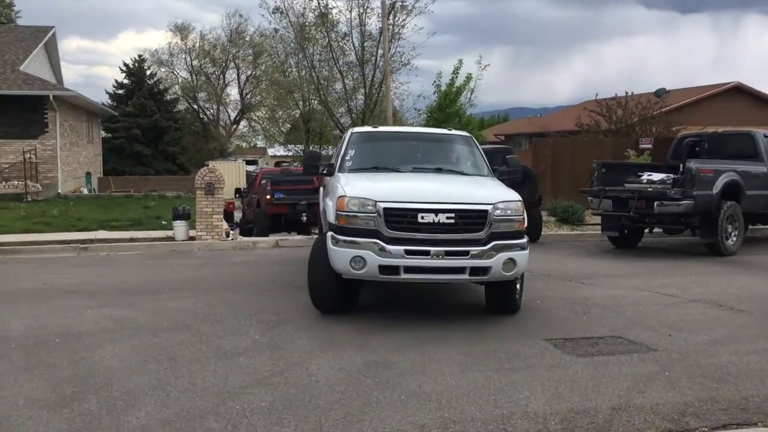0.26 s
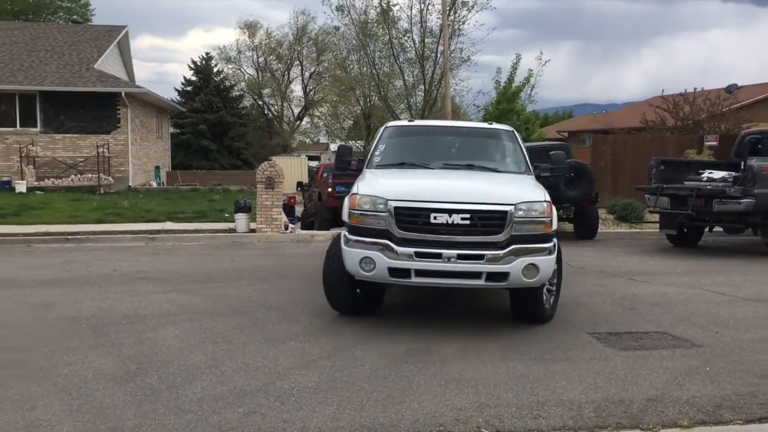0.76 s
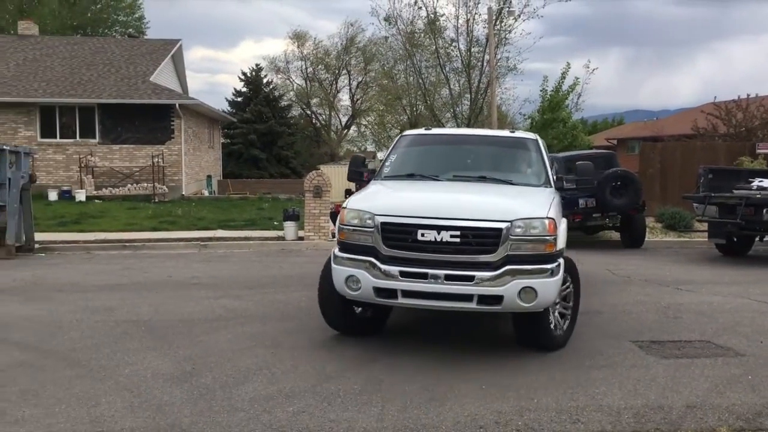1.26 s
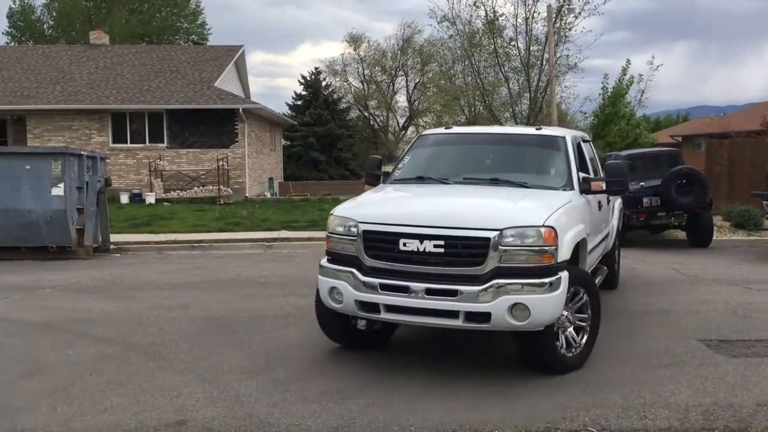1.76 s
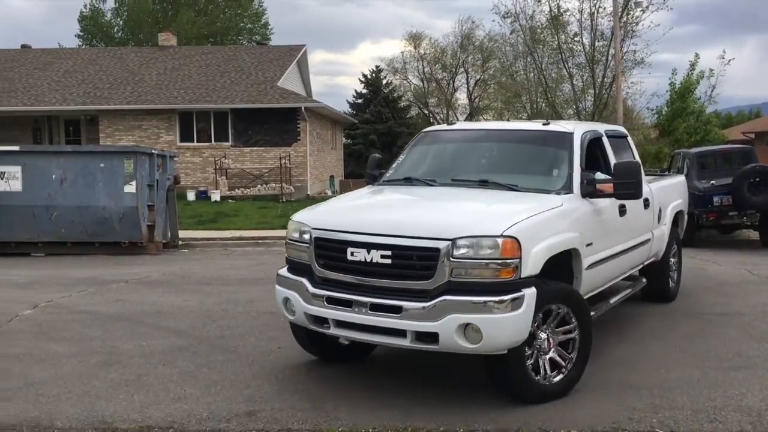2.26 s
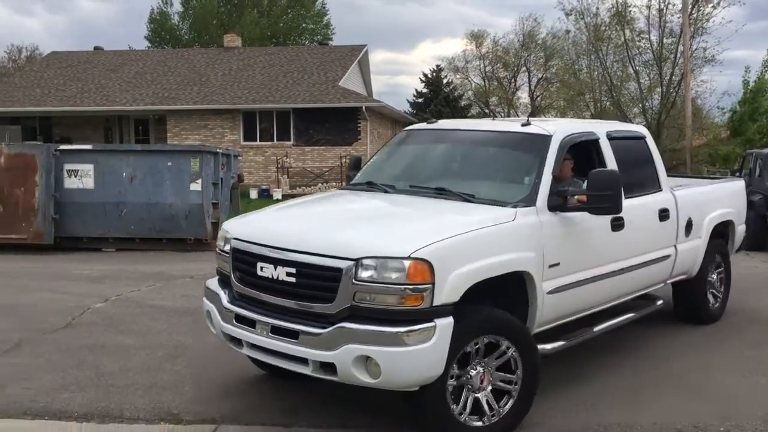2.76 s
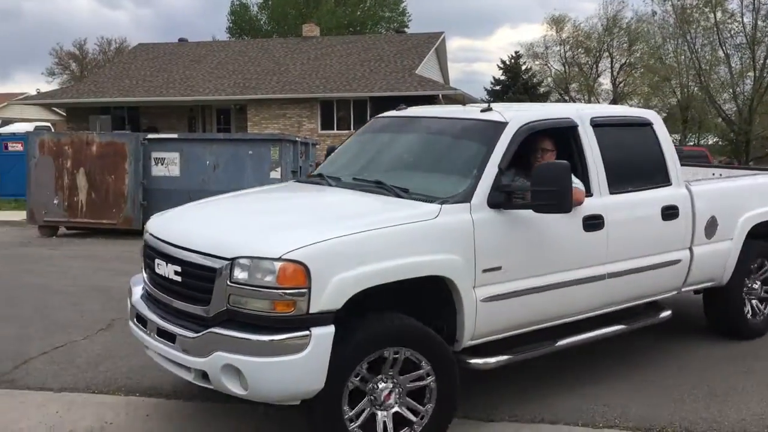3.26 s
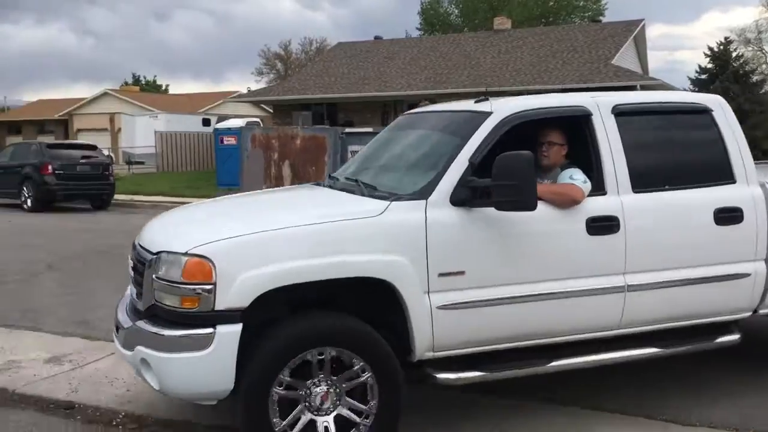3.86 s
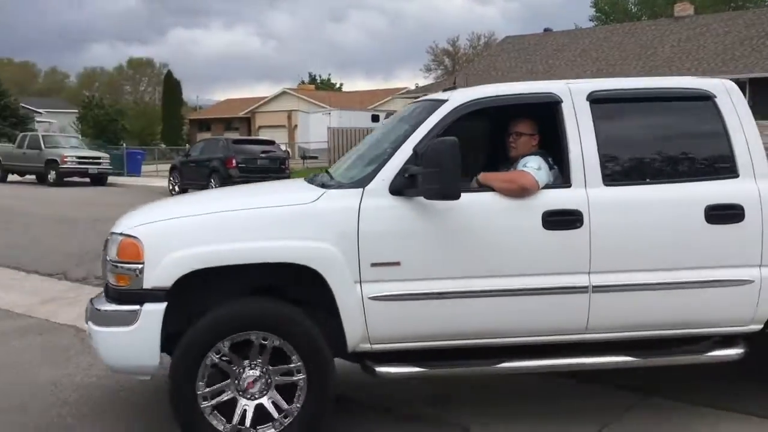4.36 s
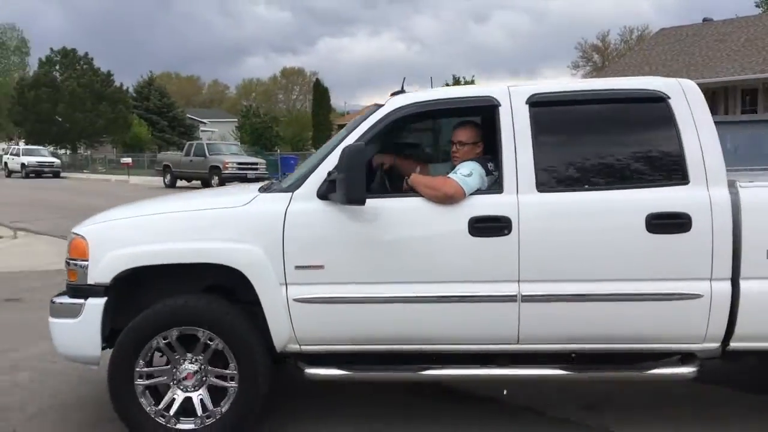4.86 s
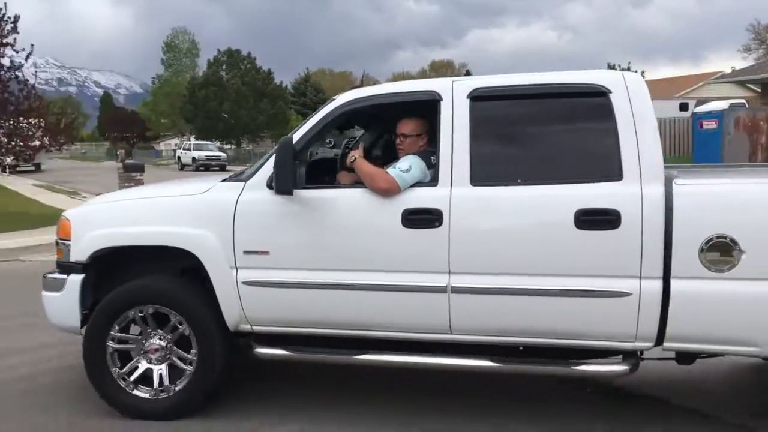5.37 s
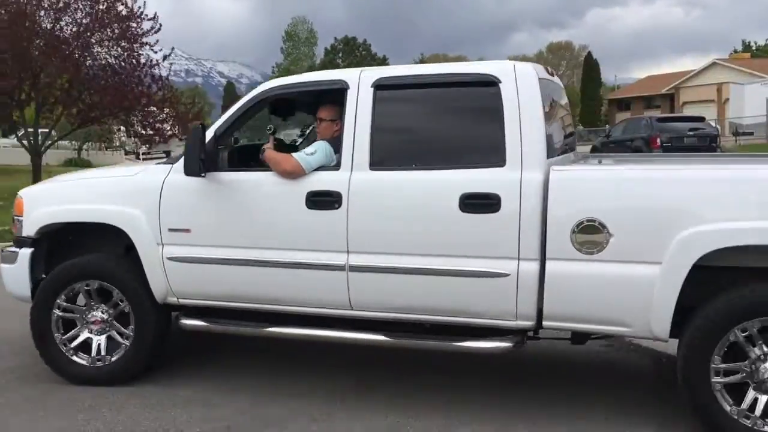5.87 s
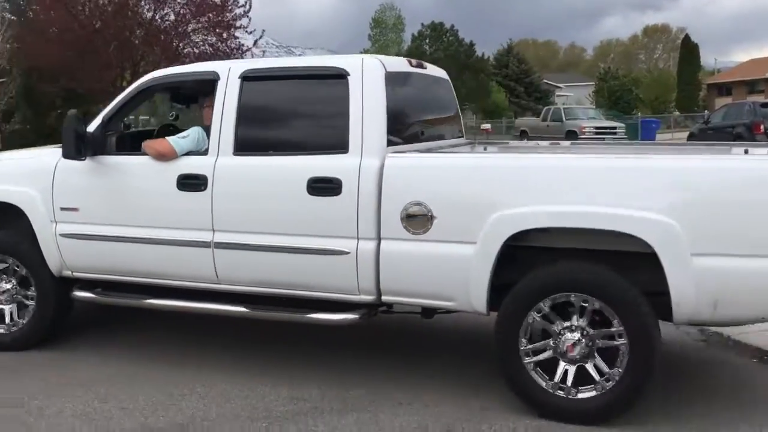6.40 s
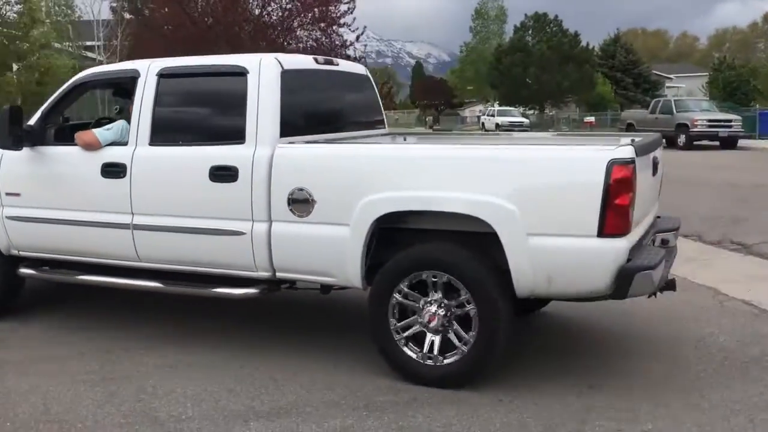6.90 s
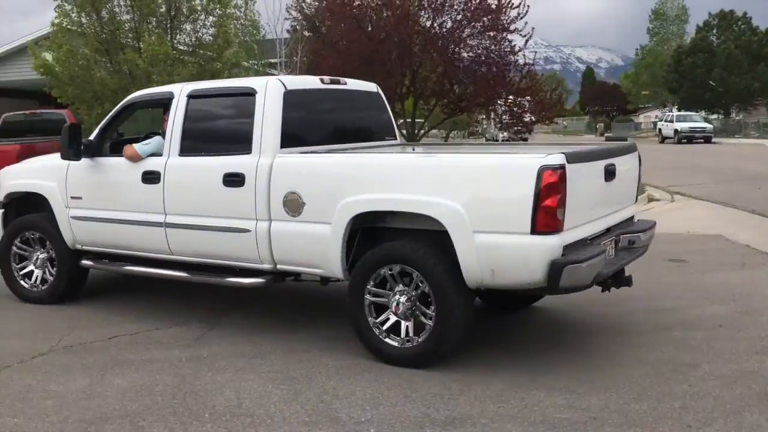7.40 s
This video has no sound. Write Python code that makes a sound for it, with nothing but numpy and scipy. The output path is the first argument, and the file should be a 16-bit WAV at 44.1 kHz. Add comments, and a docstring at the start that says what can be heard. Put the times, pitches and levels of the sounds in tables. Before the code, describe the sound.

A diesel pickup clatters slowly closer near idle, then revs up and rolls past with a swelling exhaust drone, while wind thumps the microphone.

```python
"""A breeze rumbles, flutters, thumps and flicks on the microphone throughout: noise and short pressure pulses.
At first a diesel V8 pickup creeps closer near idle; noise mixed with short rings and ticks set off by its
firings makes the clatter. Grit snaps now and then, as spikes with a tiny spray, and one hollow knock sounds
before the engine passes. Then the revs climb, the engine rolls by a few metres away, and the tailpipe's drone
swells unevenly as the rear comes near: sine tones tied to the firing rate, with a little gas noise."""
import sys
import numpy as np
from scipy import signal
from scipy.fft import rfft, irfft, next_fast_len
from scipy.io import wavfile
from scipy.ndimage import uniform_filter1d, minimum_filter1d, map_coordinates

SR = 44100
rng = np.random.default_rng(int(sys.argv[2]) if len(sys.argv) > 2 else 0)


def unload_wav(signal):
    """Save mono or channel-first audio to the path in sys.argv[1] as 16-bit WAV at rate SR, clipped to [-1, 1]."""
    wavfile.write(
        sys.argv[1],
        SR,
        np.round(np.clip(np.atleast_2d(signal).T, -1, 1) * 32767).astype(np.int16),
    )


N = 336924
TIME = np.arange(N) / SR  # seconds

# engine speed, two dabs at the pedal and then a steady pull: time_s, firings_per_s
FIRING_RATE = [(0, 43.6), (.6, 46.4), (.9, 52.4), (1.2, 52), (1.5, 47.5), (2.1, 50), (2.7, 46), (3.7, 47),
               (4.15, 54.4), (4.5, 52.3), (5.1, 60), (5.6, 65), (6.2, 66.8), (6.65, 70.8), (7.15, 68.3),
               (7.64, 68.6)]
# tone of fast air rasping on the microphone's port: pitch_hz, relative level_db
RASP_TONE = [(250, -25), (440, -3), (560, 2), (750, .5), (950, -5), (1200, -10.5), (1600, -19), (2100, -38),
             (5000, -100)]


def amp(db):
    """Turn decibels into a gain."""
    return 10 ** (np.asarray(db) / 20)


def unit(x):
    """Scale a sound to an average (rms) level of 1."""
    return x / np.sqrt(np.mean(x ** 2) + 1e-20)


def curves(rows):
    """Draw straight lines between table rows: one value per sample for each column after the time."""
    times, *columns = np.transpose(rows)
    return [np.interp(TIME, times, column) for column in columns]


def wobble(rate):
    """A smooth random curve through rate random points a second."""
    points = rng.standard_normal(int(N * rate / SR) + 4)
    return map_coordinates(points, [TIME * rate])


def filtered(x, response):
    """Multiply each frequency in x by response(hz)."""
    size = next_fast_len(N + 8192)
    hz = np.fft.rfftfreq(size, 1 / SR)
    return irfft(rfft(x, size) * response(hz), size)[:N]


def coloured(x, spectrum):
    """Shape the tone of x by (Hz, dB) points, joined by straight lines on a log pitch axis."""
    pitches, levels = np.transpose(spectrum)
    return filtered(x, lambda hz: amp(np.interp(np.log(hz + 1), np.log(pitches), levels)))


def noise(spectrum):
    """Random hiss shaped to a given tone, at rms 1."""
    return unit(coloured(rng.standard_normal(N), spectrum))


def steadied(x, span):
    """Even out the level of x over span seconds."""
    power = np.abs(uniform_filter1d(x ** 2, int(span * SR) + 1))
    return x / np.sqrt(power + 1e-4)


def breeze():
    """Pressure swings rumble on the port in clumps; faster air breaks into lumpy flutter."""
    # gusts and lulls: time_s, relative rumble level_db, flutter level_db
    gusts = [(0, -26.5, -28.5), (.35, -29, -32), (.55, -27.5, -36), (1.33, -26.5, -27.5),
             (1.46, -27, -21.5), (1.8, -27.5, -32), (1.92, -31.5, -44.5), (2.25, -37, -43.5),
             (2.3, -28.5, -33), (2.6, -27, -40.5), (2.92, -27.5, -48), (3.1, -23, -38), (3.5, -34, -40),
             (3.75, -24.5, -38.5), (3.92, -29.5, -48), (4.15, -22, -43), (4.47, -29, -45.5),
             (4.7, -26, -43), (4.91, -23.5, -45), (5.13, -23.5, -36), (5.35, -20.5, -32.5), (5.7, -26, -33),
             (6.15, -28.5, -30), (6.35, -27.5, -42), (7.64, -31.5, -45)]
    # tone of the low rumble: pitch_hz, relative level_db
    rumble_tone = [(20, -36), (30, -13), (42, -2), (56, 10), (80, 3.5), (120, 0.5), (180, -5), (260, -16),
                   (500, -57.5)]
    # tone of the steady flutter between eddies: pitch_hz, relative level_db
    flutter_tone = [(60, -41), (120, 0.5), (190, 1.5), (300, -3), (420, -7.5), (540, -16), (650, -19),
                    (850, -38), (1400, -51), (3000, -110)]

    rumble_db, flutter_db = curves(gusts)
    clumps = amp(3 * wobble(32))
    rumble = amp(rumble_db + 4.0) * steadied(clumps * noise(rumble_tone), span=0.18)
    # a strong gust churns evenly; lighter air comes in lumps
    lumps = wobble(65) * np.interp(flutter_db, [-29, -22], [1, .5])
    # the strongest gust and its biggest lumps turn raspy
    rasp_db = -17 + 2.4 * (flutter_db - flutter_db.max()) + 2 * lumps
    air = noise(flutter_tone) + amp(rasp_db) * noise(RASP_TONE)
    flutter = amp(flutter_db) * steadied(air * amp(3.5 * lumps), span=0.06)
    return rumble + flutter


def eddies(thump_db, rasp_db, rise, rasp_stretch, swing_time, swing_lead):
    """Each whirl of air hits the microphone with a sharp rasp and thump, and swings the pressure slowly."""
    # whirls: peak_s, relative thump level_db, relative rasp level_db, time scale length_s,
    # swing level_db, the pitch the swing slows toward swing_hz
    whirls = [(.008, -22.5, -29, .005, -16, 80.6), (.068, -25.5, -37, 0.0065, -24, 100),
              (0.267, -26.5, -39, 0.0041, -16, 81), (0.327, -22.5, -34, 0.0064, -23, 111.5),
              (.408, -29, -45, 0.0068, -22, 100), (0.741, -28, -45, 0.019, -20, 68.8),
              (1.097, -28, -47, 0.012, -22.5, 87.4), (1.369, -26.5, -53, .012, -15, 76),
              (1.402, -25, -41, .013, -30, 90), (1.445, -19.5, -38, .012, -29, 90),
              (1.476, -21.5, -33, 0.019, -12.5, 70), (1.523, -24, -42, 0.0078, -17, 103),
              (1.585, -24, -64, 0.0085, -11, 70), (1.68, -18.5, -46, 0.0059, -13, 84),
              (1.774, -19, -55, .005, -16.5, 92), (1.841, -16, -55, 0.0054, -12.5, 49.7),
              (2.276, -20, -58, 0.011, -5, 65), (2.316, -25, -50, .011, -24, 80),
              (2.384, -21.5, -54, 0.007, -16, 62), (2.415, -24, -50, .009, -19, 70),
              (2.448, -22, -48, .007, -26, 90), (2.471, -14.5, -38, 0.0083, -15, 67.6),
              (2.499, -19, -52, 0.005, -19, 62), (2.861, -30, -42, .006, -20, 70.4),
              (3.181, -27, -27, .005, -30, 80), (3.194, -10, -20, 0.005, -7, 44.5),
              (3.216, -28, -55, .005, -11, 55), (3.269, -9, -15, 0.0058, -5.5, 48),
              (3.386, -21, -29, .011, -10, 60), (3.415, -30, -30, .006, -22, 60),
              (3.597, -32, -32, .007, -34, 80), (3.617, -19, -29, .0065, -6, 46),
              (3.727, -15, -27, 0.0061, -9, 95), (3.817, -28, -51, 0.0056, -10, 70),
              (4.167, -26.5, -48, 0.0095, -22, 60), (4.607, -33, -52, .008, -10.5, 55),
              (4.815, -25, -46, 0.0046, -17, 69.5), (4.841, -21, -43, 0.003, -10.5, 71),
              (4.976, -20, -30, .007, -6, 72), (4.99, -25, -29, .004, -24, 80),
              (5.002, -20, -36, .006, -10, 80), (5.302, -26.5, -49, 0.0064, -11, 69.4),
              (5.44, -25, -39, 0.0062, -14, 81), (5.545, -22, -37, 0.0039, -26, 81),
              (5.931, -25.5, -33, 0.0073, -31, 80), (5.958, -23, -38, .008, -8.5, 67),
              (6.132, -24, -32, 0.0096, -13, 79), (6.514, -35, -50, 0.005, -12, 86),
              (6.672, -20, -21, 0.007, -18, 80), (6.933, -27, -46, .009, -25, 80),
              (7.118, -24, -35, 0.0056, -27, 80.6), (7.15, -29, -42, .018, -30, 80)]
    # tone of the thump's body: pitch_hz, relative level_db
    thump_tone = [(50, -2), (110, -2.5), (185, 5), (270, -3.5), (400, -8), (520, -9), (660, -24.5),
                  (900, -59), (1500, -67), (3000, -110)]
    thump_lag_s = 0.00049  # the thump comes just after the rasp

    thump, rasp = noise(thump_tone), noise(RASP_TONE)
    lead = SR // 20
    t = np.arange(-lead, 2 * lead) / SR
    out = np.zeros(N + SR)
    for s, thump_level, rasp_level, length, swing_level, swing_hz in whirls:
        start = max(round(s * SR), 0)
        place = rng.integers(N - len(t))  # which stretch of the noise to use
        parts = [(thump, thump_level + thump_db, length, t - thump_lag_s),
                 (rasp, rasp_level + rasp_db, length * rasp_stretch, t)]
        for air, db, life, u in parts:
            # rise below 1 makes the build-up quicker than the fade
            swell = np.exp(-(np.maximum(-u / rise, u) / (1.8 * life)) ** 1.4)
            puff = swell * air[place:][:len(t)]
            out[start:][:len(t)] += amp(db) * puff * np.linalg.norm(swell) / np.linalg.norm(puff)
        # the swing slows as the eddy leaves
        age = np.maximum(t + swing_lead, 0) / swing_time
        turns = swing_hz * swing_time * (age + 1.185 * (1 - np.exp(-age)))
        swing_shape = age ** 2 * np.exp(2 - 2 * age)
        swing = swing_shape * np.sin(2 * np.pi * (turns + rng.random()))
        out[start:][:len(t)] += amp(swing_level) * swing
    return out[lead:][:N]


def flicks(level_db):
    """Tiny fast eddies press on the microphone for about one cycle; small ones patter between the clear ones."""
    # clear flicks: peak_s, relative level_db, centre pitch_hz
    clear = [(.327, -17, 750), (.405, -20, 500), (1.228, -15, 470), (1.283, -15, 400), (1.325, -20, 470),
             (1.728, -18, 400), (1.769, -17, 390), (1.83, -9, 270), (2.271, -14, 250), (2.383, -15, 330),
             (2.41, -19, 400), (2.468, -10, 470), (2.499, -8, 220), (3.193, -4, 230), (3.199, -7, 780),
             (3.262, -7, 660), (3.271, -6, 620), (3.389, -12.5, 490), (3.463, -26, 520), (3.614, -10, 520),
             (3.721, -12, 500), (3.727, -7, 410), (3.825, -10, 120), (4.842, -12, 220), (4.978, -18, 750),
             (4.979, -5, 140), (5.003, -19, 470), (5.115, -23, 450), (5.185, -20, 450), (5.301, -20, 500),
             (5.376, -17, 740), (5.402, -20, 450), (5.548, -12, 540), (5.563, -20, 560),
             (5.608, -14.5, 500), (5.688, -19, 560), (5.768, -21, 480), (5.807, -18, 600),
             (5.932, -16.5, 540), (5.957, -20, 600), (6.066, -16.5, 560), (6.095, -15, 490),
             (6.133, -21, 680), (6.148, -20, 560), (6.568, -18, 400), (6.676, -13, 950), (7.116, -13, 430),
             (7.138, -17, 500), (7.156, -21, 460)]
    # gusts that break into a patter of small flicks: time_s, typical relative level_db
    patter_level = [(0, -36), (1.1, -34), (1.45, -25), (1.62, -34), (1.8, -39), (1.95, -55), (5.0, -55),
                    (5.3, -32), (5.55, -29), (5.85, -32), (6.12, -28), (6.3, -50)]
    patter_per_s, patter_hz = 65, 450
    spread_octaves, spread_db = .3, 3.5
    half_length_cycles = .62

    lead = SR // 80
    t = np.arange(-lead, lead) / SR
    out = np.zeros(N + SR)
    times = rng.uniform(0, TIME[-1], int(patter_per_s * TIME[-1]))
    size, pitch = rng.standard_normal((2, len(times)))
    patter_db = np.interp(times, *np.transpose(patter_level)) + spread_db * size
    patter = zip(times, patter_db, patter_hz * 2 ** (spread_octaves * pitch))
    for s, db, hz in [*clear, *patter]:
        wave = np.cos(2 * np.pi * (hz * t + rng.random()))
        spike = np.exp(-(hz * t / half_length_cycles) ** 2) * wave
        out[round(s * SR):][:len(t)] += amp(db + level_db) * spike
    return out[lead:][:N]


def grit(level_db, decay):
    """Small stones crack under the tread, each with one sharp spike and a tiny spray."""
    # stones: start_s, relative level_db
    stones = [(.184, -38), (2.684, -26), (2.899, -31), (3.052, -29), (3.799, -27), (4.53, -28),
              (5.076, -25), (5.532, -11), (6.128, -20), (6.377, -26)]
    # tone of one stone's crack: pitch_hz, relative level_db
    crack_tone = [(1500, -35), (4000, -19), (8000, -14), (10500, -9), (11700, 0), (13000, 0), (16000, -3)]

    t = np.arange(SR // 50) / SR
    out = np.zeros(N + SR)
    for s, db in stones:
        crack = .3 * np.exp(-t / decay) * rng.standard_normal(len(t))
        crack[0] = 2
        out[round(s * SR):][:len(t)] += amp(db + level_db) * crack
    return coloured(out[:N], crack_tone)


def knock(s, hz, db, width):
    """One short hollow knock as the truck rolls by: a sine that swells and fades quickly."""
    t = TIME - s
    return amp(db) * np.exp(-np.abs(t) / width) * np.sin(2 * np.pi * hz * t)


def passing(firings, behind_m, db_per_octave):
    """Gain of a source behind_m behind the engine: it falls with distance and grows with the revs."""
    pass_s, closest_m = 5.2, 3.9  # when the engine is closest, and how close
    travel_m_per_firing = 0.023  # low gear
    reference_hz = 50  # firings a second at which the revs add no gain
    along_m = travel_m_per_firing * (firings - np.interp(pass_s, TIME, firings)) - behind_m
    octaves = np.log2(curves(FIRING_RATE)[0] / reference_hz)
    return amp(db_per_octave * octaves) * closest_m / np.hypot(closest_m, along_m)


def exhaust(firings):
    """The pipe booms at twice the firing rate and wavers; uneven cylinders add weaker lines around it."""
    # tones of the pipe: multiple of the firing rate, relative level_db
    pipe_lines = [(1, -10.5), (1.5, -21.5), (1.748, -16.5), (1.875, -27), (2.001, -0.5), (2.25, -14.5),
                  (2.5, -18), (2.75, -20), (3, -21)]
    # the drone sinks, then swells unevenly as the rear goes by: time_s, added level_db
    drone_swell = [(4.3, 2.5), (5.1, 0.5), (5.78, -1.5), (5.95, 1.5), (6.95, 0.5), (7.3, 2)]
    waver_db, waver_turns, waver_rate = 1.0, .01, 24  # level, phase, changes a second

    lines = np.zeros(N)
    for multiple, db in pipe_lines:
        strength = amp(db + waver_db * wobble(waver_rate))
        turns = multiple * firings + rng.random() + waver_turns * wobble(waver_rate)
        lines += strength * np.sin(2 * np.pi * turns)
    gas = noise([(70, -22), (115, 2), (172, 8.0), (220, -10.5), (320, -11.5), (700, -56.0)])
    level = amp(-21 + curves(drone_swell)[0]) * passing(firings, behind_m=5.58, db_per_octave=20.5)
    return level * (lines + amp(-20.5) * gas)


def knocks(firings, lag, depth_db, scatter_db):
    """Level swells at each firing, by that cylinder's strength; at higher revs the swells merge."""
    # strength of each cylinder in firing order: relative level_db
    cylinder_strength = [-0.23, -0.73, 0.25, 0.6, 0.44, 0.53, 0.0053, -0.28]

    beat = firings - lag
    cylinder_db = np.interp(beat, np.arange(8), cylinder_strength, period=8)
    chance = np.interp(beat, np.arange(512), rng.standard_normal(512))
    distinct = np.clip(48 / curves(FIRING_RATE)[0], 0, 1) ** 2.0
    swell_db = depth_db * distinct * np.cos(2 * np.pi * beat)
    return unit(amp(cylinder_db + scatter_db * chance + swell_db))


def combustion(firings, ring_time, scatter_db):
    """Each firing sets off its cylinder bank's short ring; the two banks take turns and ring differently."""
    starts = np.flatnonzero(np.diff(np.floor(firings)))
    t = np.arange(SR // 25) / SR
    out = np.zeros(N)
    for bank in range(2):
        bank_starts = starts[bank::2]
        blows = np.zeros(N)
        blows[bank_starts] = amp(scatter_db * rng.standard_normal(len(bank_starts)))
        ring = rng.standard_normal(len(t)) * np.exp(-t / ring_time)
        out += signal.fftconvolve(blows, ring)[:N]
    return steadied(out, span=0.055)


def ringing(x, side_on):
    """The covers ring in narrow bands; each swells and fades on its own and shifts from front to side view."""
    # resonances of the block and its covers: centre_hz, width_hz, lift from the front_db, from the side_db
    covers = [(1160, 100, 0, 3), (1285, 110, 2, 4), (1880, 140, 0, 2.5), (2260, 130, 4, 1),
              (2550, 190, 2.5, 4), (2750, 200, 3, .5), (4140, 90, 3, 2), (4500, 110, 4, 4),
              (5400, 350, 2.5, .5), (6880, 160, 5, 6)]
    sway_db, sway_rate = 3, 9  # depth of the swelling, random points a second

    out = x
    for centre, width, front_db, side_db in covers:
        band = filtered(x, lambda hz: 1j * hz * width / (centre ** 2 - hz ** 2 + 1j * hz * width))
        lift = amp(front_db) + (amp(side_db) - amp(front_db)) * side_on - 1
        sway = unit(amp(sway_db * wobble(sway_rate)))
        out = out + lift * sway * band
    return out


def road_echo(x, share, far_delay, near_delay):
    """The bounce off the asphalt lags more as the engine comes close, so its comb of notches sweeps."""
    delay = np.interp(TIME, [0, 4.6, 7.64], [far_delay, near_delay, far_delay])
    return unit(x + share * np.interp(TIME - delay, TIME, x))


def engine(firings):
    """Steady noise, mixed with rings and ticks set off by the firings, rings the block; a hiss lies on top."""
    # tone of block and body panels seen from the front: pitch_hz, relative level_db
    front_tone = [(100, -26), (200, -13), (380, -6.5), (550, 9), (800, 6.5), (1200, 5), (1850, -1.5),
                  (2500, -0.5), (3100, -6), (4400, -8.5), (5000, -14), (5800, -12.5), (7000, -23.5),
                  (10000, -70)]
    # the same seen from the side: pitch_hz, relative level_db
    flank_tone = [(100, -16), (200, 18.5), (380, 4.5), (600, 11.5), (950, 4.5), (1280, 4.5), (1600, 3.5),
                  (2500, 0.5), (3100, -2), (4400, -5.5), (5000, -10), (5800, -7), (7000, -16), (10000, -70)]
    # tone of injector and tyre hiss: pitch_hz, relative level_db
    hiss_tone = [(3000, -30), (5500, -3), (6800, 1), (7700, -3), (9600, -1), (10500, -8), (11200, 0),
                 (12200, 2), (15600, .5), (16500, -8)]
    # clatter and hiss surge and slacken, then the cab and bed shade the engine bay: time_s, added level_db
    surges = [(.85, 1.6), (1.65, -1.2), (2.15, 2.5), (2.55, 0.5), (3.1, 2.5), (3.35, 0), (3.8, 0.7),
              (4.08, 0.8), (4.45, 1), (5, -0.25), (5.5, 0.7), (5.9, 0.8), (6.5, 0.5), (7.2, -2.5)]

    side_on = np.interp(TIME, [3.2, 5.2], [0, 1])  # 0 = front view, 1 = side view
    ring = combustion(firings, ring_time=0.018, scatter_db=2)
    ring = coloured(ring, [(1500, -1.6), (3000, -1), (6000, -1)])
    ticks = combustion(firings, ring_time=.0015, scatter_db=5)
    ticks = coloured(ticks, [(700, -8), (2000, 0), (4000, 2)])
    mix = ringing(rng.standard_normal(N) + .65 * ring + .3 * ticks, side_on)
    front = unit(coloured(mix, front_tone))
    flank = unit(coloured(mix, flank_tone))
    block = (1 - side_on) * front + side_on * flank
    block = road_echo(block, share=0.034, far_delay=0.00136, near_delay=0.00282)
    clatter = block * knocks(firings, lag=0.27, depth_db=0.0, scatter_db=1.05)
    clatter *= amp(-40.5) * passing(firings, behind_m=0, db_per_octave=8)
    # the hiss is slightly rough: its level flutters quickly at random
    rough = unit(coloured(rng.standard_normal(N) * amp(0.95 * wobble(1200)), hiss_tone))
    hiss = rough * knocks(firings, lag=0.28, depth_db=1.5, scatter_db=1.5)
    hiss *= amp(-54) * passing(firings, behind_m=0, db_per_octave=11)
    return amp(curves(surges)[0]) * (clatter + hiss)


def scene():
    """One count of firings drives clatter and drone; the wind sits on the microphone itself."""
    thumps = eddies(thump_db=4.5, rasp_db=-5.0, rise=0.74, rasp_stretch=0.9,
                    swing_time=0.012, swing_lead=0.0051)
    wind = breeze() + thumps + flicks(level_db=-1.5)
    firings = np.cumsum(curves(FIRING_RATE)[0]) / SR  # firings so far
    stones = grit(level_db=2, decay=.0015)
    hollow = knock(s=4.762, hz=717, db=-21, width=.003)
    truck = stones + hollow + exhaust(firings) + engine(firings)
    return (wind + truck)[None]


def record(dry):
    """A limiter eases the gain down for the loudest peaks; the ends are softened and the top is cut off."""
    needed = np.minimum(1, .95 / (np.abs(dry[0]) + 1e-9))
    gain = uniform_filter1d(minimum_filter1d(needed, size=221), size=221)
    ends = np.minimum(1, np.minimum(TIME, TIME[-1] - TIME) / .003)
    top_hz = 15950
    return filtered(ends * gain * dry[0], lambda hz: hz < top_hz)[None]


dry = scene()
out = record(dry)
unload_wav(out)
```